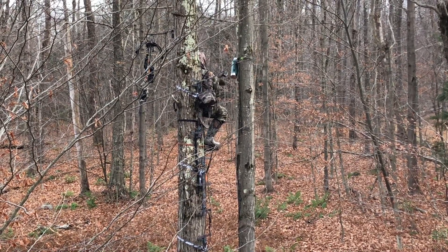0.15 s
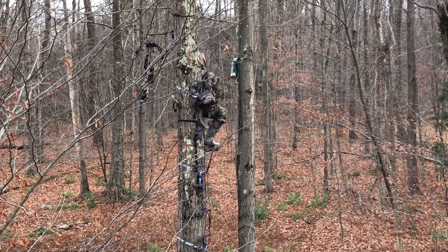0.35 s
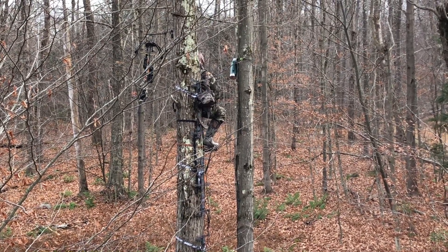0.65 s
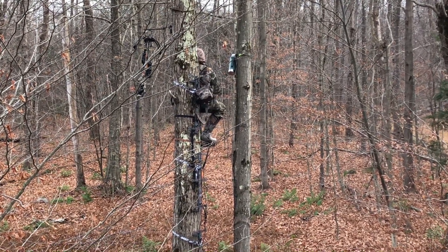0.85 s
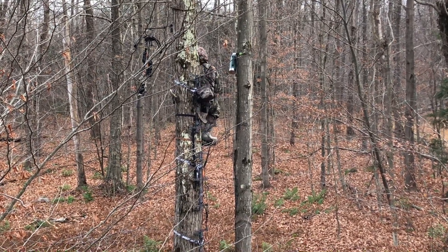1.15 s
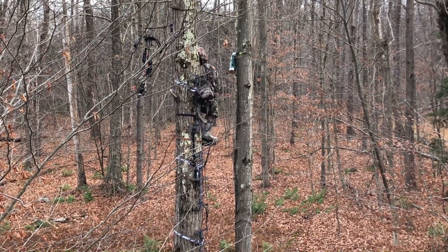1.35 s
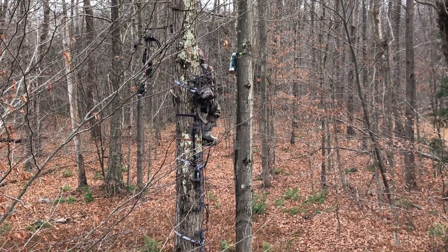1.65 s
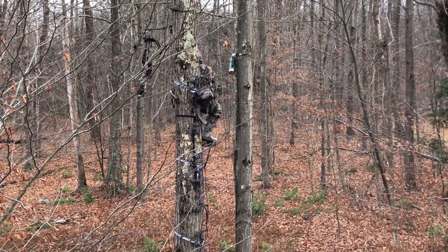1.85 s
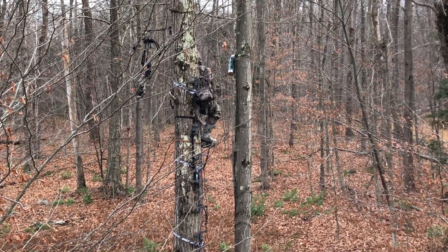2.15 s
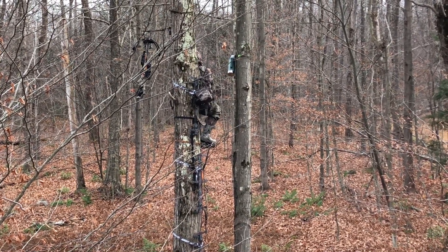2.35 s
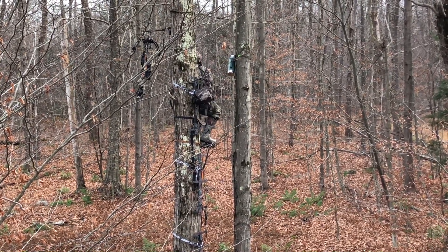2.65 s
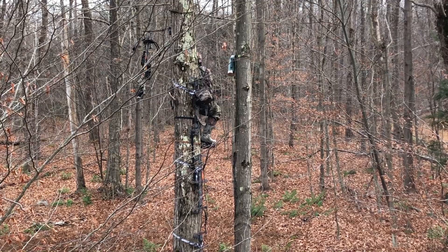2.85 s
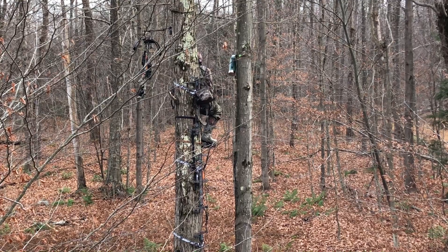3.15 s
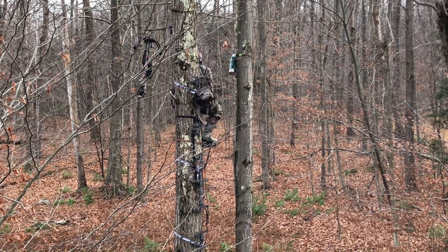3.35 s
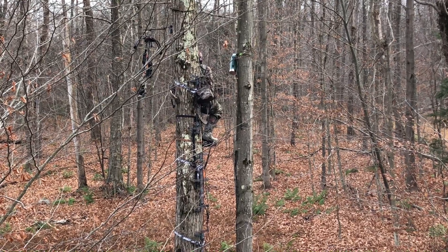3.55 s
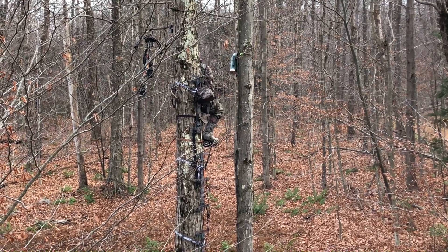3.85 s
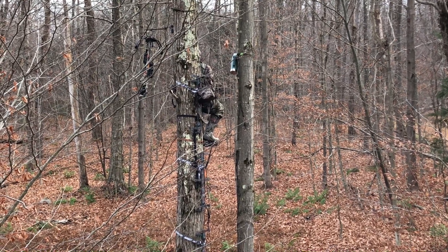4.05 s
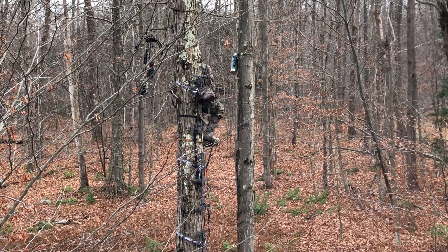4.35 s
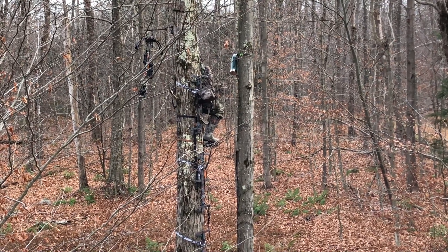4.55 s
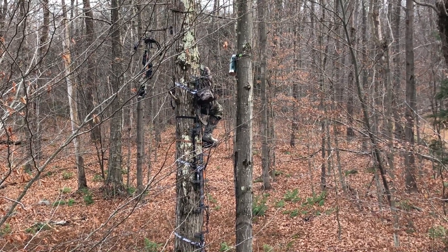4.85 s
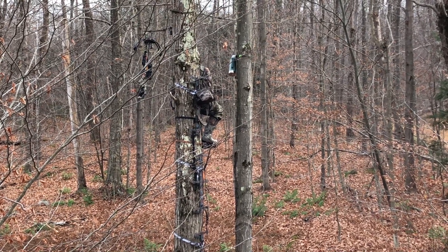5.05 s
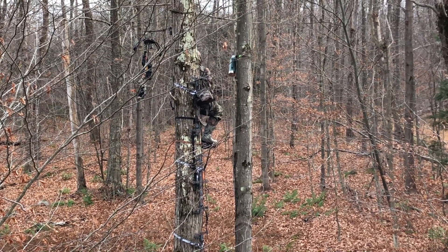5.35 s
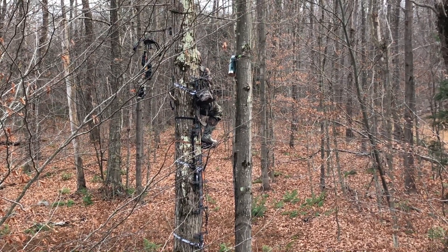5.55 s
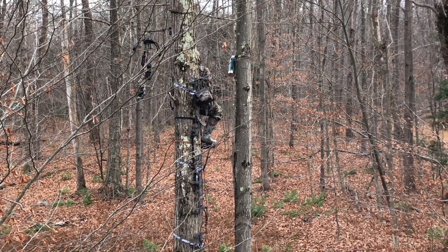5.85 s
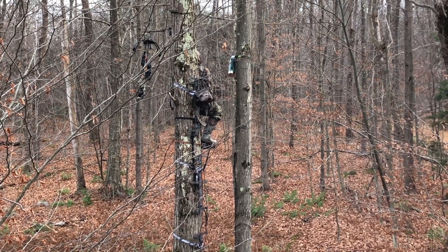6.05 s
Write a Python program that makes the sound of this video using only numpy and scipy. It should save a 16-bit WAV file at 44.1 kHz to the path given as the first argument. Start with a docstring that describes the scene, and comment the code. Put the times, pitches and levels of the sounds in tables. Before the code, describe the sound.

Two hard deer antlers are rattled together in bare woods. Firm cracks land at about 0.06 and 0.33 s; the level dips very briefly near 0.75, then the sharpest clash hits at 0.85. Lighter knocks follow from 1.0 to 1.9, with a couple of dull, soft low thumps close to the microphone around 1.1 to 1.17. Strong clashes return at 2.14, 2.44 and 2.75, some with a short scrape before and a quick rebound after. From 2.9 to 3.7 the tines knock in uneven quick runs, and from 3.9 to 4.85 they chatter most densely. Spaced blows follow, bright and snappy at 5.25, heavier at 5.85, with a small clatter after 6.0. Every contact is dry and bony, ringing only for hundredths of a second, with a lumpy scatter from trunks and a thin fading tail. Faint low rumble and small wind gusts lie beneath.

```python
"""Dry, bony antler rattling in woods: hard clashes, then quick runs of tines knocking and skidding.
A hunter in a tree rattles two deer antlers; each contact is a sum of bending modes plus noise cracks.
Shaped noise scatters each contact back from bare trunks, dying away in the woods.
Decaying low sines make a few dull bumps near the microphone; coloured noise makes distant rumble
and a light gusting breeze. The level dips briefly once."""
import sys
import numpy as np
from scipy import signal
from scipy.fft import rfft, irfft, next_fast_len
from scipy.io import wavfile

SR = 44100
rng = np.random.default_rng(int(sys.argv[2]) if len(sys.argv) > 2 else 0)


def int16_out(signal):
    """Quantize to a 16-bit WAV file."""
    q = np.round(np.clip(np.atleast_2d(signal).T, -1, 1) * 32767)
    wavfile.write(sys.argv[1], SR, q.astype(np.int16))


N = 273861
USUAL_DB = -35.5  # level of an ordinary stroke

# band filters for knock, body and snap: order, band [Hz]
BANDS = ((2, [750, 2000]), (3, [2200, 6200]), (3, [6000, 20000]))
REGISTERS = [signal.butter(order, band_hz, 'bandpass', fs=SR, output='sos') for order, band_hz in BANDS]


def amp(db):
    """Decibels to gain."""
    return 10 ** (np.asarray(db) / 20)


def unit(x):
    """x at rms 1."""
    return x / np.sqrt(np.mean(x ** 2) + 1e-20)


def along(points, hz):
    """(Hz, value) points interpolated on a log frequency axis."""
    points_hz, values = np.transpose(points)
    return np.interp(np.log(hz + 1), np.log(points_hz), values)


def filtered(x, response):
    """x filtered by a gain that is a function of frequency."""
    size = next_fast_len(len(x) + 4096)
    spectrum = rfft(x, size) * response(np.fft.rfftfreq(size, 1 / SR))
    return irfft(spectrum, size)[:len(x)]


def noise(spectrum, size):
    """Coloured noise of rms 1."""
    return unit(filtered(rng.standard_normal(size), lambda hz: amp(along(spectrum, hz))))


def add(track, s, sound):
    """Mix a sound into the track at s seconds."""
    part = track[round(s * SR):][:len(sound)]
    part += sound[:len(part)]


def antlers():
    """Every contact arrives straight and again by way of the trees; the tines chatter as they slide on."""
    # the struck tine rings clearest under a light touch, away from the knocking beam and snapping tip
    tine_base_db, tine_per_knock, tine_per_snap, tine_per_level = 2, -0.45, -0.5, -0.35  # slopes: dB/dB
    # a knock on the beam singles out its pitch
    focus_base_db, focus_per_knock = 6.5, 0.19  # slope: dB/dB
    # harder contacts stand further above their echo
    woods_db, echo_per_level = -1.85, -0.14  # slope: dB/dB
    # summed over all directions, the knock varies less and the tine's ring is weaker
    echo_knock_share, echo_tine_db = 0.76, -9
    chatter_db, chatter_start_s, chatter_span_s = -11, 0.008, 0.06

    track = np.zeros(N)
    for s, level_db, knock_db, snap_db, beam_hz, tine_hz in contacts():
        force_db = level_db - USUAL_DB
        tine_db = tine_base_db + tine_per_knock * knock_db + tine_per_snap * snap_db
        tine_db += tine_per_level * force_db
        focus_db = focus_base_db + focus_per_knock * knock_db
        blow = amp(level_db) * strike(knock_db, snap_db, beam_hz, tine_hz, tine_db, focus_db)
        thrown = amp(level_db) * strike(echo_knock_share * knock_db, snap_db, beam_hz, tine_hz,
                                        tine_db + echo_tine_db, focus_base_db)
        add(track, s, blow)
        add(track, s, amp(woods_db + echo_per_level * force_db) * scattered(thrown))
        # five bounces of random force, weaker on average the later they come
        for when, force in rng.random(size=(5, 2)):
            bounce = amp(chatter_db) * force * (1 - when / 2) * blow
            add(track, s + chatter_start_s + when * chatter_span_s, bounce)
    return track


def contacts():
    """Each stroke as graze, blow and rebound: (s, level dB, knock dB, snap dB, beam Hz, tine Hz)."""
    # strokes of the antlers: (time [s], body level [dB], low knock re body [dB], high snap re body [dB],
    # beam pitch [Hz], struck tine's pitch [Hz], graze lead [s], rebound strength [0-1]); 0 = none
    strokes = [(0.062, -29.5, -5, -13, 1980, 4070, 0.0058, 0),
               (0.333, -26.5, -6.5, -7.5, 1750, 5370, 0.0046, 0.31),
               (0.742, -47, -2.5, -12, 1397, 3830, 0, 0.04), (0.8502, -23.5, -10.5, -7.5, 1400, 3840, 0, 0),
               (0.8654, -41.5, 6, -31, 1440, 4680, 0, 0.01),
               (1.0173, -37, -1, -6, 970, 4726, 0.00052, 0.42), (1.138, -40, -2, -6.5, 1180, 7200, 0, 0),
               (1.1995, -35.5, -1, -11.5, 855, 3970, .017, 0.35),
               (1.398, -39, -7.5, -8, 1969, 3424, .014, 0.53),
               (1.6469, -46.5, 12, -4.5, 1026, 3300, 0, 0.7),
               (1.8887, -35.5, -5.5, -5, 799, 3960, 0.0037, 0.03),
               (2.1358, -25.5, -7, -6, 1879, 7360, 0.00035, 0.3),
               (2.4356, -29, -4.5, -12.5, 1850, 3300, 0.0062, 0.46),
               (2.7541, -33.5, -2.5, -9, 1907, 4570, 0.021, 0.28), (2.8365, -45, -1, -21, 845, 2980, 0, 0),
               (2.9154, -41, -5.5, -10.5, 1533, 4130, 0, 0.38),
               (2.9987, -37, -6.5, -10, 1485, 5900, 0.00048, 0.3),
               (3.1534, -43, -8.5, -14.5, 1922, 4530, 0.0002, 0.31),
               (3.2013, -38.5, -3.5, -5, 1042, 3680, 0.02, 0), (3.236, -39.5, -7, -8, 1110, 4867, 0, 0),
               (3.4148, -33, -11, -7, 1050, 6020, 0.0045, 0),
               (3.4329, -38.5, -3, -5.5, 1470, 4422, 0, 0.65),
               (3.6177, -43, -5, -13, 1443, 4897, 0.00041, 0.02),
               (3.6652, -44, -1, -29, 1062, 3575, 0.00066, 0.01),
               (3.9044, -32.5, 3.5, -11.5, 1521, 2579, 0.0028, 0.02),
               (4.0811, -36, -8, -3, 1645, 5840, 0.0022, 0), (4.1208, -36, -2, -17, 1420, 3063, 0, 0),
               (4.254, -37, -2, -10, 2140, 2286, 0, 0.01),
               (4.272, -35.5, -7, -5.5, 1850, 5495, 0.00064, .4),
               (4.3177, -34, -5, -15, 1370, 3392, 0.001, 0.01),
               (4.4813, -38, -5.5, -10.5, 1720, 3898, 0.00028, 0.39),
               (4.54, -38.5, -4, -5, 2090, 5080, 0.0013, 0.02),
               (4.6045, -41.5, -2.5, -4.5, 1439, 5100, 0.00015, 0),
               (4.7033, -42.5, -1.5, -18, 933, 4337, .035, 0),
               (4.8281, -45, -2, -4.5, 1939, 4410, 0.00043, 0), (4.841, -46.5, 3, -15, 1350, 6290, 0, 0),
               (5.0449, -44, 13, -13, 1148, 3080, .019, 0.55),
               (5.247, -30, -7.5, -2.5, 1696, 5420, 0.0064, 0.15),
               (5.45, -35, -1, -11, 1168, 3412, .034, .45), (5.5141, -44, 3.5, -14, 1690, 2696, 0, 0.02),
               (5.661, -38.5, -3.5, -10, 1580, 4050, 0.00048, 0.36),
               (5.8457, -29.5, -2.5, -11.5, 1170, 2600, 0.03, 0),
               (6.0182, -44.5, -2, 1.5, 1088, 6430, 0.00062, 0.01),
               (6.0602, -37, -5, -10.5, 1080, 3740, 0, 0.34), (6.119, -44, 0, -7, 1797, 2730, 0, 0.73)]
    # a graze is weaker the longer its lead, and grows only partly with the blow's force
    graze_base_db, graze_db_per_s, graze_follows = -41, -220, 0.65
    # the antlers spring apart and meet once more, with less snap
    rebound_s, rebound_spread_s, rebound_snap_db = 0.039, 0.001, -2

    slips = rng.standard_normal(len(strokes))
    for stroke, slip in zip(strokes, slips):
        s, level_db, knock_db, snap_db, beam_hz, tine_hz, lead_s, rebound = stroke
        light_knock_db = min(knock_db, 0)
        if lead_s > 0:
            graze_db = graze_base_db + graze_follows * (level_db - USUAL_DB) + graze_db_per_s * lead_s
            yield s - lead_s, graze_db, light_knock_db, snap_db, beam_hz, tine_hz
        yield s, level_db, knock_db, snap_db, beam_hz, tine_hz
        if rebound > 0:
            again_s = s + rebound_s + rebound_spread_s * slip
            again_db = level_db + 20 * np.log10(rebound)
            yield again_s, again_db, light_knock_db, snap_db + rebound_snap_db, beam_hz, tine_hz


def strike(knock_db, snap_db, beam_hz, tine_hz, tine_db, focus_db):
    """One contact: the tines bite, skid over a few ridges and ring both antlers' bending modes."""
    # antlers' bending modes: (frequency [Hz], relative level [dB], t60 [s])
    antler_modes = [(852, -4.5, 0.043), (1073, -5, 0.05), (1165, -11.5, 0.023), (1354, -1.5, 0.042),
                    (1543, 0.5, 0.043), (1813, -1.5, 0.039), (2079, 4, 0.026), (2460, -15, 0.0092),
                    (2706, -4, 0.048), (2896, 13, 0.0052), (3264, 11.5, 0.0068), (3500, 1, 0.059),
                    (3884, 6.5, 0.024), (4405, 3.5, 0.028), (4730, 10.5, 0.0061), (5230, -46, 0.0057),
                    (5410, -3, 0.03), (5820, 6, 0.0084), (6260, -1.5, 0.034), (6760, 2.5, 0.015),
                    (7590, -1.5, 0.018), (8450, -2.5, 0.01), (10320, -8.5, 0.013)]
    # crack of bone on bone: (frequency [Hz], relative density [dB per Hz])
    crack_spectrum = [(100, 22.5), (550, 5), (850, -29), (1500, -2.5), (2400, 8.5), (3800, 2), (6500, -7.5),
                      (9000, -9), (12000, -16), (16000, -21)]
    crack_db, crack_t60_s, tine_t60_s = 11, 0.031, 0.028
    focus_width = 0.1  # natural log of frequency ratio
    skid_db, skid_s = -6, 0.007
    vary_db, detune = 2, 0.02  # standard deviations; detune is a fraction of pitch

    t = np.arange(SR // 25) / SR
    rows = list(antler_modes) + [(tine_hz, tine_db, tine_t60_s)]
    hz, db, t60_s = np.transpose(rows)[:, :, None]
    # the place of contact favours modes near the beam's pitch
    db = db + focus_db * np.exp(-(np.log(hz / beam_hz) / focus_width) ** 2)
    # grip and direction change the strength and pitch of every mode
    size, shift, phase = rng.standard_normal((3, len(hz), 1))
    envelopes = amp(db + vary_db * size - 60 * t / t60_s)
    modes = envelopes * np.sin(2 * np.pi * (hz * (1 + detune * shift) * t + phase))
    crack_envelope = amp(crack_db - 60 * t / crack_t60_s)
    bone = modes.sum(0) + crack_envelope * noise(crack_spectrum, len(t))
    # each ridge of the skid gives a fresh small crack
    for when, force in rng.random(size=(3, 2)):
        ridge = amp(skid_db) * force * crack_envelope * noise(crack_spectrum, len(t))
        add(bone, when * skid_s, ridge)
    # thick beams knock low, hard tips snap high
    knock, body, snap = [unit(signal.sosfilt(register, bone)) for register in REGISTERS]
    blow = amp(knock_db) * knock + body + amp(snap_db) * snap
    # body energy equals rms 1 over 10 ms
    return blow * np.sqrt(0.01 * SR / len(t))


def scattered(blow):
    """The trees gather the blow from all directions, which evens out its narrow peaks and gaps."""
    # colour of the woods' answer: (frequency [Hz], gain [dB])
    echo_colour = [(200, 9), (800, 1), (1500, -5.5), (3000, 1.5), (6000, 1), (10000, 4), (16000, 4)]
    blur = 0.076  # smoothing half-width, fraction of frequency

    hz = np.fft.rfftfreq(len(blow), 1 / SR)
    energy = np.cumsum(np.abs(rfft(blow)) ** 2) * hz[1]
    reach_hz = blur * hz + hz[1]
    upper = np.interp(hz + reach_hz, hz, energy)
    lower = np.interp(hz - reach_hz, hz, energy)
    power = np.abs(upper - lower) / (2 * reach_hz)
    return filtered(woods(), lambda f: np.sqrt(np.interp(f, hz, power)) * amp(along(echo_colour, f)))


def woods():
    """Echo of one contact: a quick, lumpy scatter from near trunks and a long faint tail."""
    # far ring time of the woods: (frequency [Hz], t60 [s])
    ring_times = [(300, 0.27), (1300, 1), (3500, 0.79), (6500, 0.54), (10000, 0.36), (16000, 0.14)]
    near_t60_s, far_db, rise_s = 0.24, -9, 0.026
    grain_db, grain_rate_hz = 2.0, 500

    hz, t, grid = signal.stft(rng.standard_normal(SR * 3 // 4), SR, nperseg=256)
    near = amp(-60 * t / near_t60_s)
    far = amp(far_db) * amp(-60 * t / along(ring_times, hz)[:, None])
    tail = signal.istft(grid * np.hypot(near, far), SR, nperseg=256)[1]
    t = np.arange(len(tail)) / SR
    lumps = np.interp(t * grain_rate_hz, np.arange(SR // 40), rng.standard_normal(SR // 40))
    tail = tail * amp(grain_db * lumps) * np.sqrt(1 - np.exp(-t / rise_s))
    return tail / np.linalg.norm(tail)


def bumps():
    """Soft low pushes: sines that swell and fade exponentially within a cycle or so, with no ring."""
    # dull bumps: (centre time [s], envelope peak [dB], frequency [Hz], rise and fall constant [s])
    dull_bumps = [(0.876, -42, 71, 0.016), (1.093, -31, 298, 0.002), (1.098, -19, 96, 0.0025),
                  (1.131, -36, 87.9, 0.01), (1.155, -19.5, 262, 0.0013), (1.165, -36.5, 134, 0.017),
                  (5.877, -38, 138.7, 0.0063)]
    t = np.arange(N) / SR
    track = np.zeros(N)
    for s, db, hz, length_s in dull_bumps:
        envelope = amp(db) * np.exp(-np.abs(t - s) / length_s)
        track += envelope * np.sin(2 * np.pi * hz * (t - s))
    return track


def air():
    """Steady distant rumble through the trees; a light breeze on the microphone swells in short gusts."""
    # distant rumble: (frequency [Hz], relative density [dB per Hz])
    rumble_spectrum = [(20, -57), (45, -34), (70, -8), (100, -8), (132, 1), (165, -2.5), (250, -4.5),
                       (400, -12.5), (650, -17.5), (1000, -23.5), (2000, -27), (4000, -35.5), (8000, -44.5),
                       (16000, -54)]
    # gusts on the microphone: (time [s], added level [dB])
    gusts = [(0.87, -54), (1.12, -45), (3.85, -54), (5.16, -48), (5.88, -44.5), (6.15, -51)]
    # breeze: (frequency [Hz], relative density [dB per Hz])
    breeze_spectrum = [(15, -38), (28, -21), (44, -1), (70, -4.5), (130, -6.5), (500, -26.5), (2000, -100)]
    gust_s, calm_db, rumble_db = 0.071, -64.5, -50  # gust_s: rise and fall constant

    t = np.arange(N) / SR
    buffet = amp(calm_db) + sum(amp(db) * np.exp(-np.abs(t - s) / gust_s) for s, db in gusts)
    breeze = buffet * noise(breeze_spectrum, N)
    rumble = amp(rumble_db) * noise(rumble_spectrum, N)
    return rumble + breeze


def scene():
    """Antlers, bumps and air at one microphone."""
    return (antlers() + bumps() + air())[None]


def record(dry):
    """The level dips briefly once, and nothing is kept above the band limit."""
    dip_at_s, dip_db, fall_s, recover_s = 0.754, -35, 0.0067, 0.0093
    top_hz = 16000
    t = np.arange(N) / SR - dip_at_s
    depth = np.exp(-np.abs(t / np.where(t < 0, fall_s, recover_s)))
    return filtered(dry[0] * amp(dip_db * depth), lambda hz: hz < top_hz)[None]


dry = scene()
out = record(dry)
int16_out(out)
```